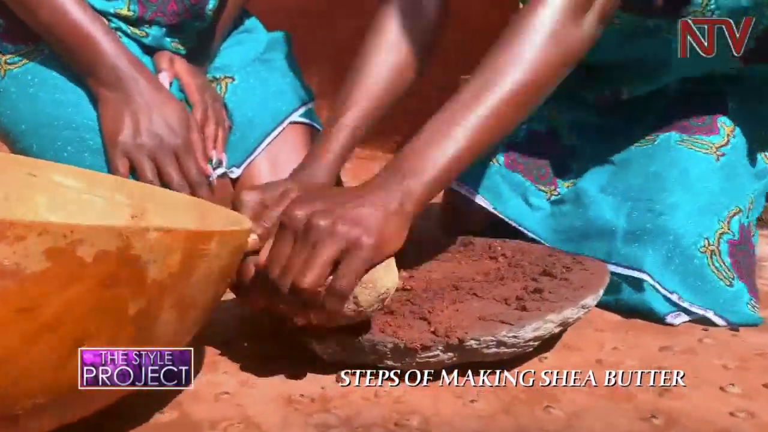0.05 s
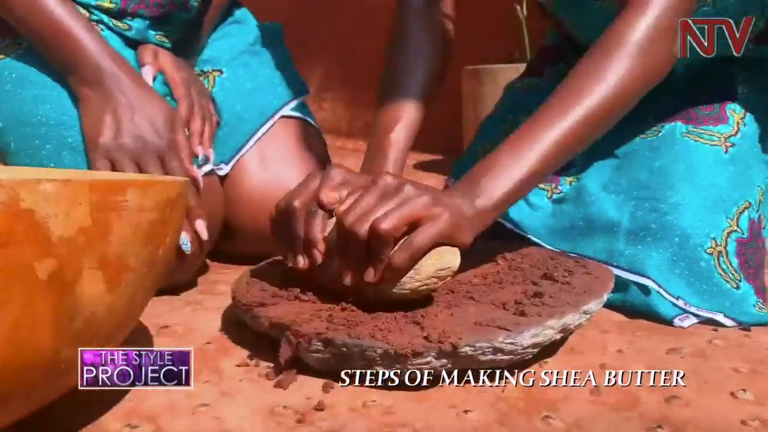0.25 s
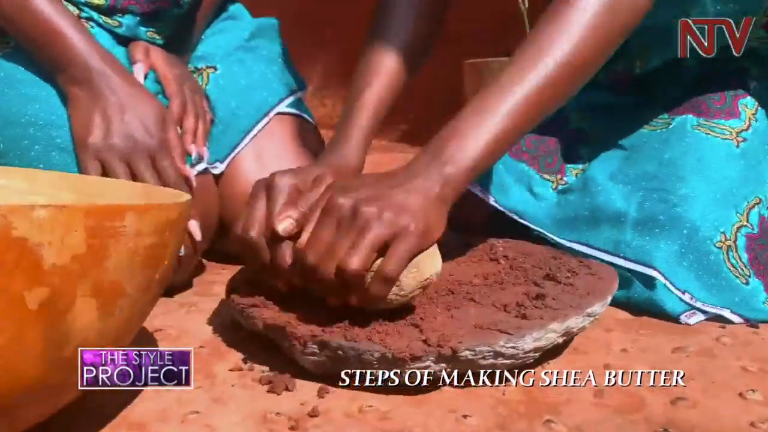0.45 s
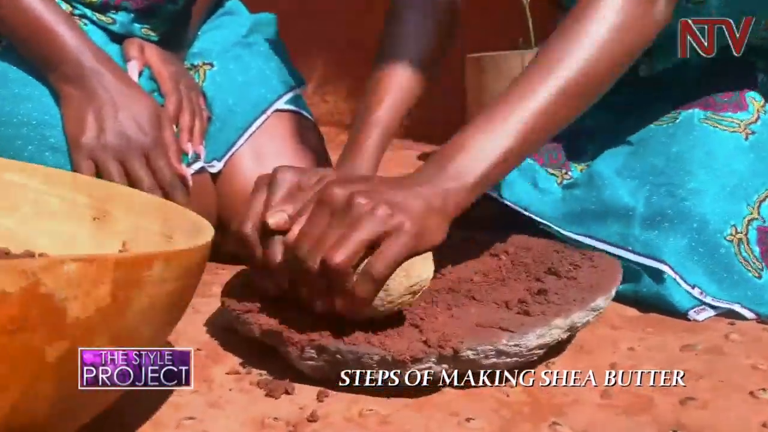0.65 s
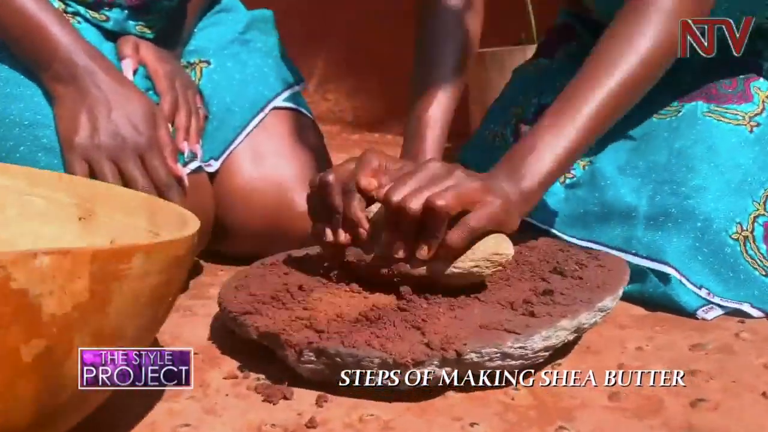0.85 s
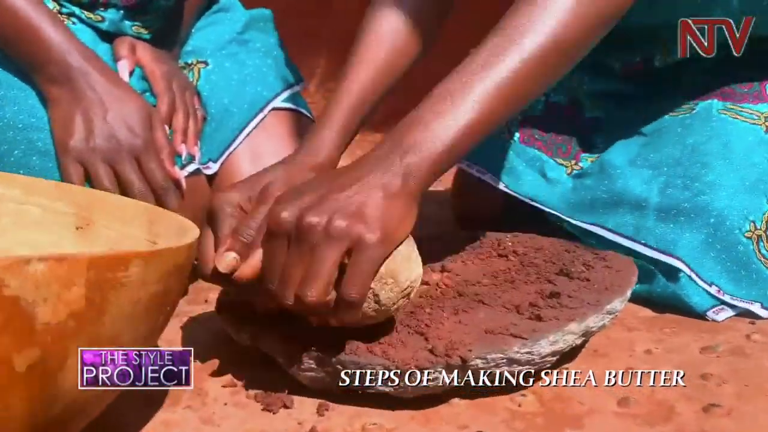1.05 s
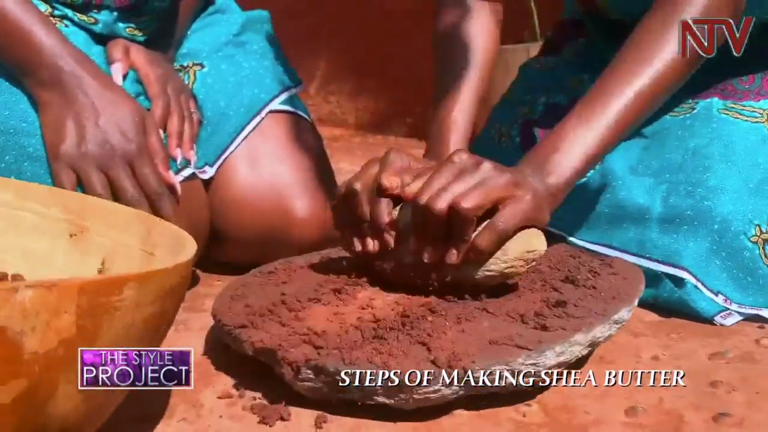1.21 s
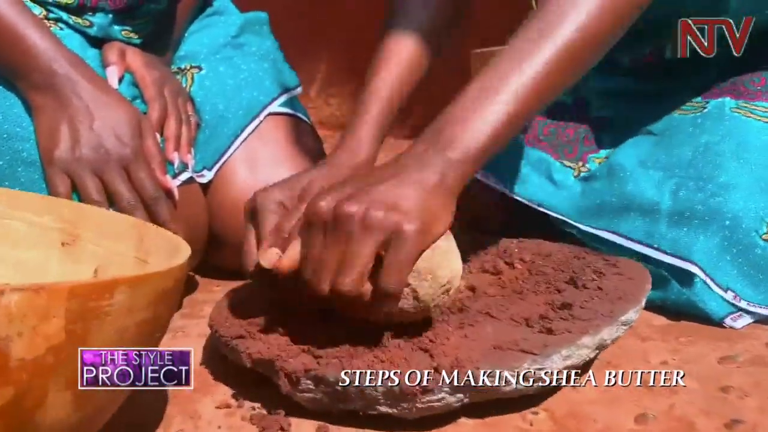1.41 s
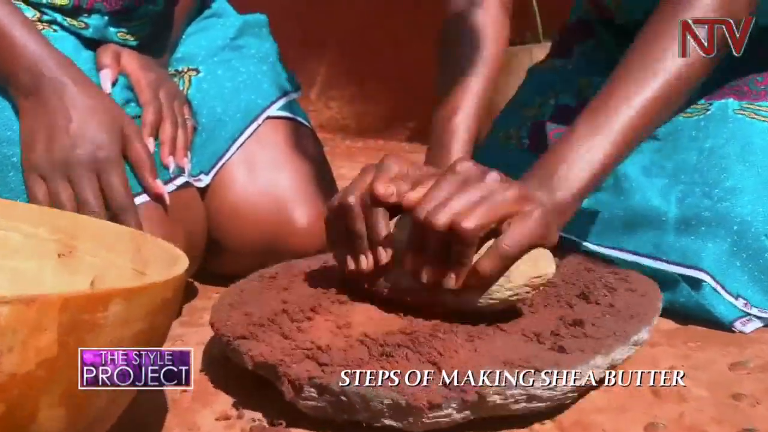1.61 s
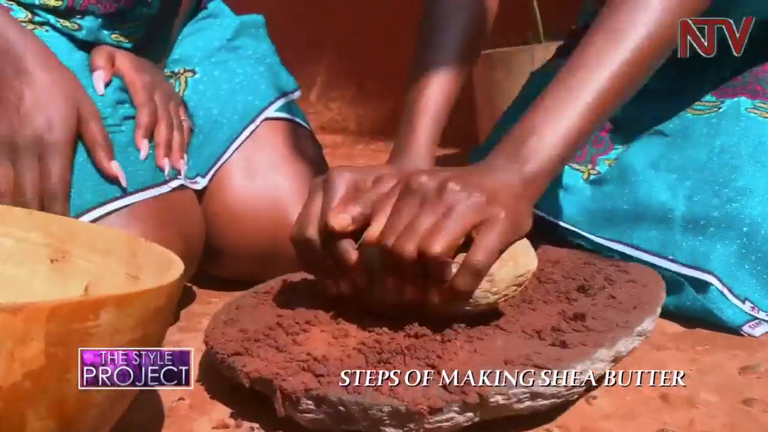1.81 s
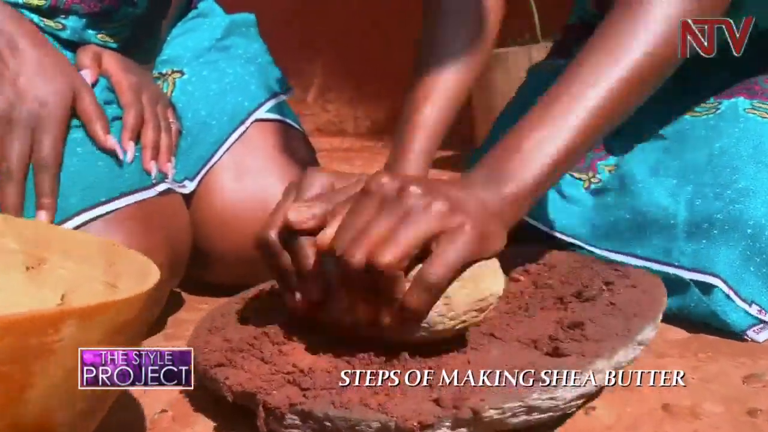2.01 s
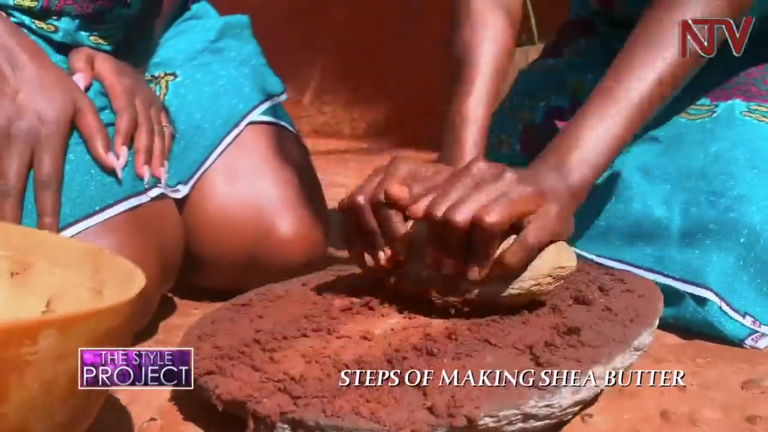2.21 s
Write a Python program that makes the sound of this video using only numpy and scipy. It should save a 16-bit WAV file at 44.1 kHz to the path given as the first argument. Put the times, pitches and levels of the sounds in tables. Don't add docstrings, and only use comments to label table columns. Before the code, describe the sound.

A hand stone rubs to and fro over crushed nuts on a stone slab, about six or seven gritty strokes per second. A brief rasp and light nut taps open it. The slab knocks dully on the ground, heaviest near 0.45, 1.35, 1.7 and 2.06 seconds, where a bright nut crack snaps. Hiss strengthens towards the end. Close, dry, sometimes overloaded outdoor sound over low breeze.

```python
import sys
import numpy as np
from scipy import signal
from scipy.io import wavfile

SR = 44100
rng = np.random.default_rng(int(sys.argv[2]) if len(sys.argv) > 2 else 0)


def boost_factor(decibels):
    exponent = np.asarray(decibels, float) / 20
    return 10 ** exponent


def wav_out(sig):
    wavfile.write(sys.argv[1], SR, np.round(np.clip(np.atleast_2d(sig).T, -1, 1) * 32767).astype(np.int16))


N = 99710


def rms_one(x):
    return x / np.sqrt(np.mean(x ** 2) + 1e-20)


def band(x, low_hz, high_hz):
    sos = signal.butter(2, [low_hz, high_hz], "band", fs=SR, output="sos")
    return signal.sosfilt(sos, x + 1e-18)


def soften(x, hz):
    r = np.exp(-2 * np.pi * hz / SR)
    return signal.lfilter([(1 - r) ** 2], [1, -2 * r, r * r], x)


def drift(rate_hz):
    run_in = 9000
    return rms_one(soften(rng.standard_normal(N + run_in), rate_hz)[run_in:])


def ring(clicks, hz, t60):
    r = boost_factor(-60 / (t60 * SR))
    w = 2 * np.pi * hz / SR
    return signal.lfilter([0, np.sin(w)], [1, -2 * r * np.cos(w), r * r], clicks + 1e-18)


def grains(per_s, spread_db):
    size = boost_factor(spread_db * np.minimum(rng.exponential(1, N), 4))
    sign = rng.choice([-1, 1], N)
    return size * sign * (rng.random(N) < per_s / SR)


def clicks_at(s, size):
    out = np.zeros(N)
    index = np.clip((np.asarray(s) * SR).astype(int), 0, N - 1)
    np.add.at(out, index, size)
    return out


def coloured(source, spectrum, low_hz, count, patchy_db):
    hz, db = np.transpose(spectrum)
    edges = low_hz * 2 ** (np.arange(count + 1) / 3)
    out = np.zeros(N)
    for k, (low, high) in enumerate(zip(edges, edges[1:])):
        level_db = np.interp(np.log(low * high) / 2, np.log(hz), db) + patchy_db * drift(13)
        out += boost_factor(level_db) * band(source[k % 2], low, high)
    return rms_one(out)


def puff(s, db, decay_s, low_hz, high_hz):
    t = np.arange(N) / SR - s
    fade = (t > 0) * np.exp(-np.maximum(t, 0) / decay_s)
    return boost_factor(db) * band(rng.standard_normal(N) * fade, low_hz, high_hz)


# (pitch [Hz], level [dB])
AIR_TONE = [(12, -38), (20, 2.5), (118, 11.5), (477, -58.5), (659, -12), (807, -24), (1670, -22.5),
            (2500, -26.5), (3250, -67), (5500, -120)]


def open_air():
    noise = rng.standard_normal((2, N))
    return boost_factor(-31.5) * coloured(noise, AIR_TONE, 19.97, count=21, patchy_db=2.5)


# (time [s], level [dB], pitch [Hz], t60 [s])
NUT_TAPS = [
    (.0465, -11, 1034, .012),
    (.049, -12, 760, .018),
    (.0525, -13, 900, .014),
    (.056, -14, 600, .02),
    (.060, -18, 760, .02),
]


def rolling_nut():
    return sum(band(ring(clicks_at([s], boost_factor(db)), hz, t60), 350, 2200) for s, db, hz, t60 in NUT_TAPS)


# (start [s], end [s], hiss at full speed [dB])
STROKES = [(-.09, 0.076, -42.5), (0.121, 0.259, -44.5), (0.273, 0.399, -46.5), (0.446, 0.594, -43),
           (0.595, 0.724, -42.5), (0.786, .925, -43.5), (0.94, 1.072, -44), (1.108, 1.279, -39.5),
           (1.259, 1.445, -46.5), (1.484, 1.608, -40), (1.597, 1.772, -40.5), (1.803, 1.96, -42.5),
           (1.952, 2.131, -39), (2.149, 2.356, -39)]


def stroke_db():
    t = np.arange(N) / SR
    total = boost_factor(-53)
    for start, end, db in STROKES:
        arch = np.sin(np.pi * np.clip((t - start) / (end - start), 0, 1))
        speed = np.minimum(1.38 * arch, 1)
        total = total + boost_factor(db) * speed ** 0.9
    return 20 * np.log10(total)


# (time [s], level [dB], decay [s])
NUT_SNAPS = [
    (1.291, -20, 0.0016),
    (1.565, -42, 0.0025),
    (1.628, -28, 0.0037),
    (1.707, -22, 0.0029),
    (2.0631, 2.5, 0.0012),
    (2.0645, -11.5, 0.0084),
]


def nut_snaps():
    snaps = sum(puff(s, db, decay_s, 6740, 18700) for s, db, decay_s in NUT_SNAPS)
    return snaps + boost_factor(-8.5) * band(snaps, 15600, 16100)


# (pitch [Hz], level per Hz [dB])
GRIT_TONE = [(1500, -13.5), (2500, -4), (4100, 5), (5500, -2.5), (8300, 5), (11500, 4.5), (13000, 4.5),
             (15500, -1)]
# (low edge [Hz], high edge [Hz], depth [0-1])
GROUND_DIPS = [(9080, 10200, 0.75), (12470, 14300, 1)]


def grit(level_db):
    crackle = rms_one(grains(per_s=3300, spread_db=3.6))
    source = rng.standard_normal((2, N)) + boost_factor(-6) * crackle
    out = coloured(source, GRIT_TONE, 1602, count=11, patchy_db=3.13) * boost_factor(level_db + 2.5)
    out = signal.sosfilt(signal.ellip(10, .5, 70, 15700, fs=SR, output="sos"), out)
    out = out + nut_snaps()
    for low_hz, high_hz, depth in GROUND_DIPS:
        depth = np.clip(depth + 0.04 * drift(5.1), 0, 1)
        stop = signal.butter(2, [low_hz, high_hz], "stop", fs=SR, output="sos")
        out = (1 - depth) * out + depth * signal.sosfilt(stop, out)
    return out


# (start [s], length [s], level [dB])
RUBS = [(0, 0.024, -19), (0.141, 0.042, -34.5), (0.309, 0.056, -31.5), (0.638, 0.063, -25.5),
        (.855, 0.024, -39.5), (0.956, 0.0822, -29), (1.108, 0.033, -37.5), (1.181, 0.049, -37),
        (1.286, 0.071, -31), (1.388, 0.041, -44), (1.518, 0.037, -39.5), (1.65, 0.0493, -29.5),
        (1.879, .03, -35.5), (1.996, 0.069, -28), (2.064, 0.029, -20), (2.092, 0.056, -44),
        (2.197, .055, -38)]


def judder():
    t = np.arange(N) / SR
    edge_s = 0.0033
    gain = np.zeros(N)
    for start, length, db in RUBS:
        rise = t - start + edge_s
        fall = (start + length - t) / 2 + edge_s
        gain += boost_factor(db) * np.clip(np.minimum(rise, fall) / edge_s, 0, 1)
    return gain * boost_factor(1.13 * drift(48)) * rms_one(grains(per_s=1500, spread_db=1.17)) * 0.075


def settling(s, db):
    r = boost_factor(-60 / (0.3 * SR))
    power = signal.lfilter([1], [1, -r * r], clicks_at(s, boost_factor(2 * db)))
    return boost_factor(-16.5) * grains(per_s=450, spread_db=2) * np.sqrt(power)


def stroke_load(level_db):
    press_db = -33.5 + 0.31 * (level_db + 41)
    return boost_factor(press_db + 3 * drift(20)) * rms_one(grains(per_s=800, spread_db=1.5)) * .025


def luck_db(s):
    return rng.normal(0, 4.5, len(s))


# (pitch [Hz], level [dB], t60 [s])
ROCKING_MODES = [(79.8, -9, 0.45), (109, -3, 0.15), (166.3, 0, 0.056), (234.9, 0.5, 0.073),
                 (295.6, 7, 0.039), (368, 3, 0.029), (416.7, -2.5, 0.015)]


def rocking_slab(s, db, thud_db, touches, rub, load):
    bed_db = -9.5
    low = ring(clicks_at(s, boost_factor(db + bed_db + 9)), hz=325, t60=.028)
    soft_touches = soften(touches, 314)
    for hz, mode_db, t60 in ROCKING_MODES:
        hit_db = db + luck_db(s) + (thud_db + 4.5) * (hz < 200)
        hit = clicks_at(s + .5 / hz, boost_factor(hit_db))
        drive = boost_factor(bed_db) * (hit + soft_touches) + boost_factor(-6.5) * rub + load
        low = low + boost_factor(mode_db) * ring(drive, hz, t60)
    return band(soften(low, 1190), 82.5, 5000)


# (pitch [Hz], level [dB], t60 [s])
PLATE_MODES = [(600, 1.5, 0.023), (682, -0.5, 0.053), (900, -8, 0.014), (1143, -1, 0.028),
               (1425, 1, 0.0067), (1638.4, -3, 0.096), (1700, -9.5, 0.083), (2224, -7, 0.01),
               (2638, -16, 0.056), (3075, -20, 0.026), (3713, -28, 0.094), (4086, -16, 0.024)]


def ringing_slab(s, db, ring_db, touches, rub, load):
    plate_db = -12
    high = boost_factor(21) * band(rub, 344, 1830)
    for k, (hz, mode_db, t60) in enumerate(PLATE_MODES):
        hit_db = db + plate_db + luck_db(s) + (ring_db + 11.5) * (hz > 1000)
        hit = clicks_at(s + 0.00053, boost_factor(hit_db))
        drive = hit + boost_factor(plate_db - 13.5) * touches + rub + boost_factor(-21.5) * load
        high = high + boost_factor(mode_db) * (-1) ** k * ring(drive, hz, t60)
    return soften(high, 4700)


def knock_cracks(s, db, crack_db):
    fade = np.exp(-1 / (0.002 * SR))
    burst = signal.lfilter([1], [1, -fade], clicks_at(s, boost_factor(db + crack_db + 16)))
    crack = band(burst * rng.standard_normal(N), 1760, 4140)
    return band(crack, 1760, 4140)


# (time [s], peak level [dB], ring level [dB], crack level [dB], thud level [dB])
KNOCKS = [(0.123, -1, -18.5, -65, -36), (0.155, -10, -16.5, -39, -25), (0.27, -21, -12, -16, 3),
          (0.321, -12.5, -11.5, -35, -10), (0.447, 4.5, -18.5, -41.5, -56), (0.488, -13.5, -58, -22, -18),
          (0.625, -10.5, -16.5, -9, -18), (0.634, -3, -44, -39, -22), (0.742, -8, -72, -55, -0.5),
          (0.802, -19, -63, -17.5, 1), (0.961, -16, -45, -32, -9), (0.985, -6, -43, -30, -10.5),
          (1.116, -25.5, -9, -17, -26), (1.206, -8, -48, -29, -15), (1.291, -11.5, -21, -38, 6),
          (1.329, 0.5, -49, -41.5, -15), (1.351, 1.5, -29, -37, -7), (1.639, -11.5, -17.5, -23, -0.5),
          (1.705, 6.5, -20.5, -40, -21.5), (1.726, -0.5, -25, -56, -4), (1.748, -3.5, -17.5, -62, -1),
          (2.059, 4, -12, -25, -17), (2.094, -5, -55, -47, 0), (2.111, -8, -36, -40, 3.5)]


def slab(level_db):
    s, db, ring_db, crack_db, thud_db = np.transpose(KNOCKS)
    s = s + .0025
    touches = settling(s, db)
    rub = judder()
    load = stroke_load(level_db)
    low = rocking_slab(s, db, thud_db, touches, rub, load)
    high = ringing_slab(s, db, ring_db, touches, rub, load)
    return low + high + knock_cracks(s, db, crack_db)


def scene():
    level_db = stroke_db()
    return (open_air() + rolling_nut() + grit(level_db) + slab(level_db))[None]


def band_limit(x):
    return signal.sosfilt(signal.butter(12, 16950, fs=SR, output="sos"), x)


def record(dry):
    x = dry / (1 + np.abs(dry) ** 8) ** (1 / 8)
    x = signal.sosfilt(signal.ellip(8, .2, 60, 16000, fs=SR, output="sos"), x)
    mix = np.clip(x, -1, 1)
    return band_limit(mix)


dry = scene()
out = record(dry)
wav_out(out)
```